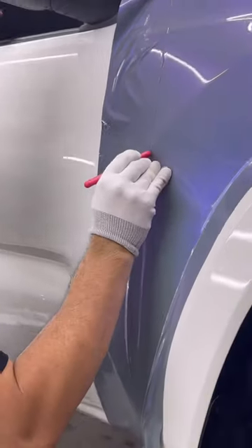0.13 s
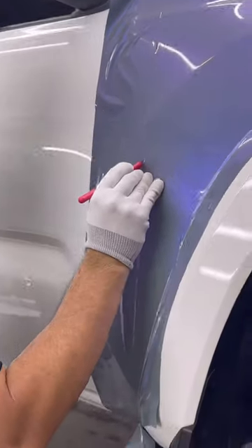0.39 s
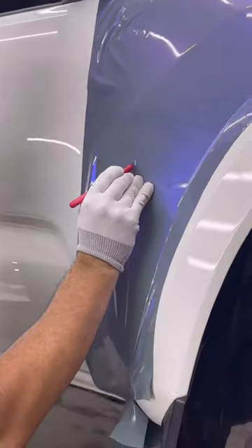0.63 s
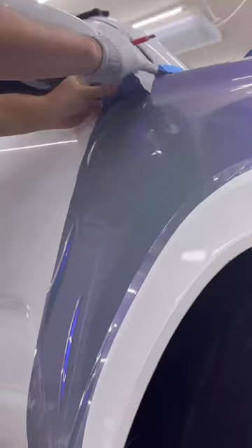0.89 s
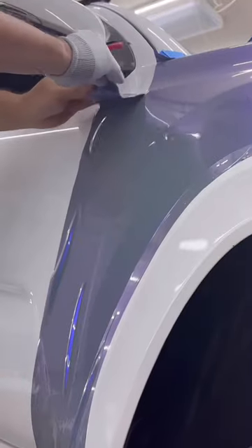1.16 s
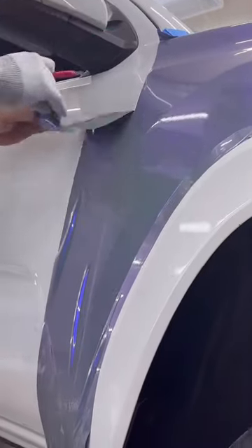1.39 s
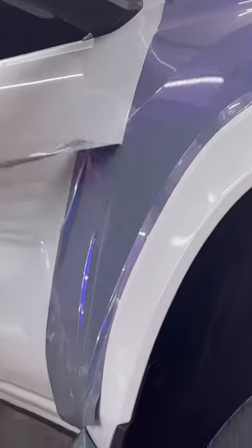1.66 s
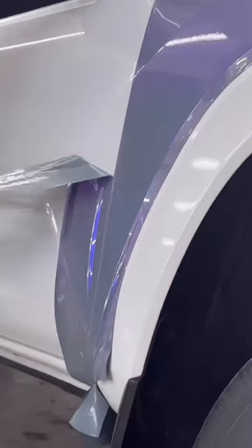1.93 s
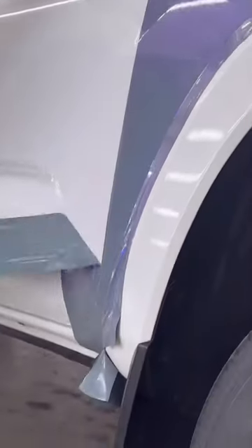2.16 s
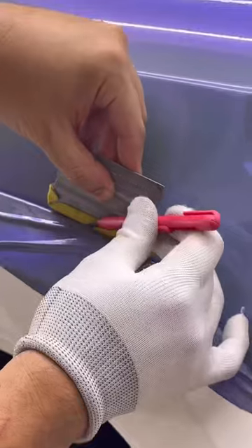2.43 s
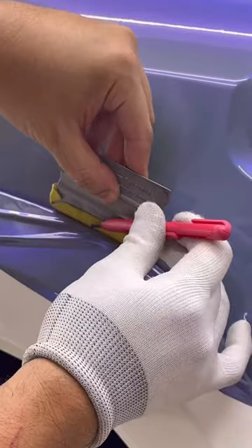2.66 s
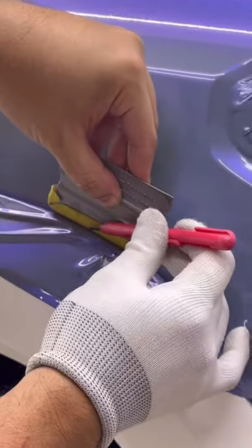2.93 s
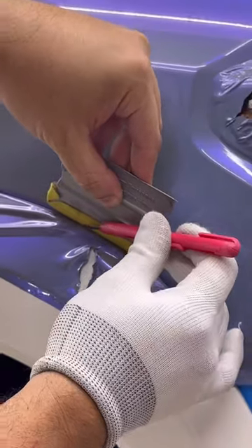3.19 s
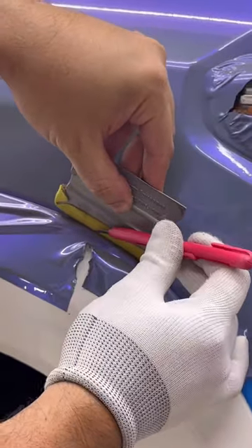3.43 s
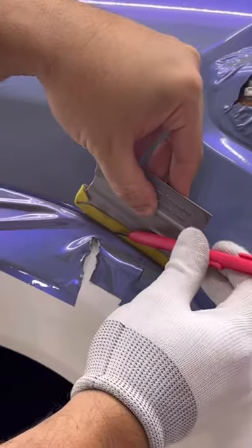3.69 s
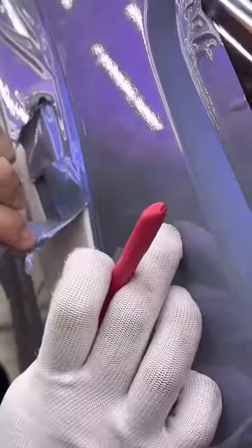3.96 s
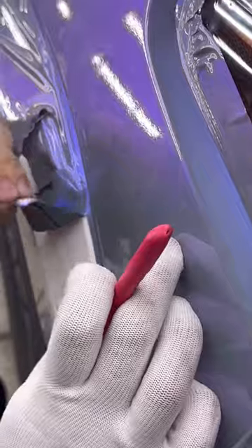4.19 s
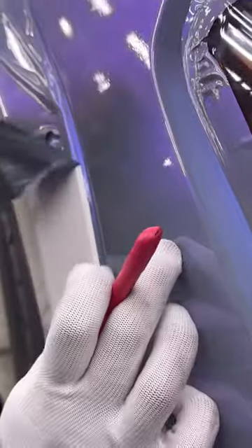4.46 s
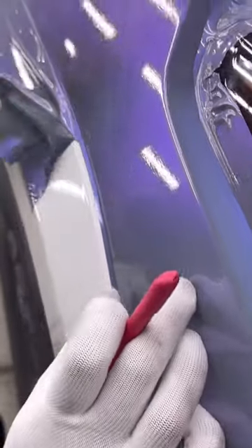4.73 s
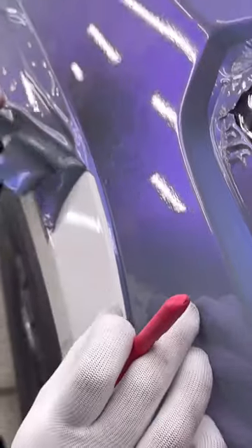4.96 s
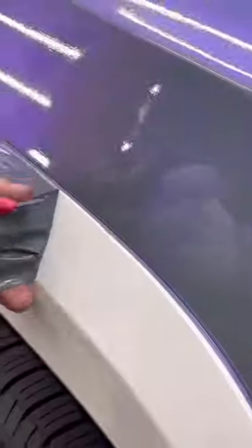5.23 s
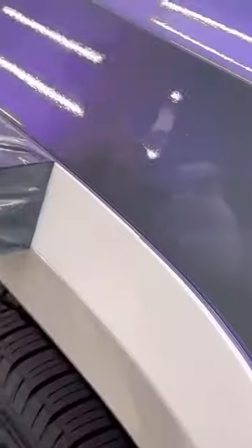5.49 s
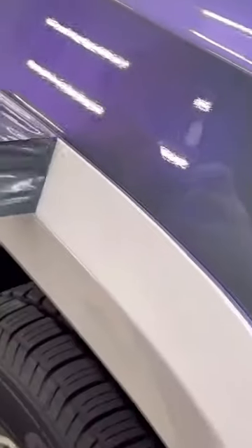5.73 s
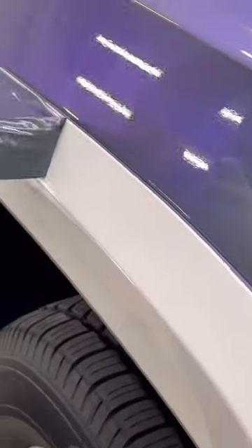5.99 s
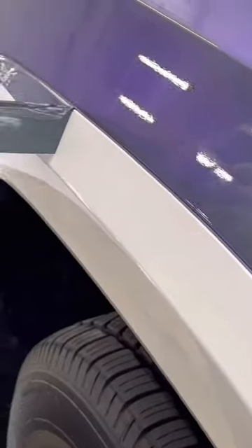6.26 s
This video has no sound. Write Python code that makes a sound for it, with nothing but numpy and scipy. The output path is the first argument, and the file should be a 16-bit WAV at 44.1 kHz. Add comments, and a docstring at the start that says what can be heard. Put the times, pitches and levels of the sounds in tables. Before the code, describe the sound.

In a workshop with low rumble, a blade slides with a faint hiss and small ticks. A wide sheet of sticky vinyl then rips off a car panel in dense, taut, hollow-ringing bursts. It stops abruptly for a very quiet scrape, then a narrow strip pops loose in sharp snaps and light rustle, ending in a rapid zipping peel. Close stereo microphone, short room answer.

```python
"""A low rumble and the hiss of a sliding blade come first, with small ticks where the blade catches.
Then a wide strip of vinyl wrap rips off a car panel in bursts, a blade follows a squeegee, and a narrow
strip snaps loose, rustles and zips away. Each letting-go of the glue is a short burst of ringing noise that
also drums the taut film. Rumble, air and blade are coloured noise; decaying noise makes the workshop's answer."""
import sys
import numpy as np
from scipy import signal
from scipy.fft import rfft, irfft, next_fast_len
from scipy.io import wavfile
from scipy.ndimage import map_coordinates

SR = 44100
rng = np.random.default_rng(int(sys.argv[2]) if len(sys.argv) > 2 else 0)


def dump(signal):
    """Clip the signal to [-1, 1] and save it as 16-bit WAV at the path in sys.argv[1]."""
    limited = np.clip(np.atleast_2d(signal).T, -1, 1)
    pcm = np.round(limited * 32767).astype(np.int16)
    wavfile.write(sys.argv[1], SR, pcm)


def volts_from_decibels(level):
    """Turn decibel levels (scalar or array-like) into linear amplitude factors."""
    exponent = np.asarray(level, float) / 20
    return 10 ** exponent


N = 280917

# The four parts: blade, wide strip, blade after squeegee, narrow strip. Columns: start_s, end_s
PARTS = [(0, .835), (.835, 2.316), (2.316, 3.89), (3.89, 6.37)]


def during(part):
    """One inside a part, zero outside, with a 3 ms slope at each end."""
    t = np.arange(N) / SR
    return np.clip(np.minimum(t - part[0], part[1] - t) / .003 + .5, 0, 1)


def unit(x):
    """Scale a sound to an rms level of 1."""
    return x / np.sqrt(np.mean(x ** 2) + 1e-20)


def along(points, hz):
    """Read a curve of (Hz, value) points on a logarithmic frequency axis."""
    f, v = np.transpose(points)
    return np.interp(np.log(hz + 1), np.log(f + 1), v)


def read(rows, t):
    """Read each column after the time column, at times t."""
    s, *columns = np.transpose(rows)
    return [np.interp(t, s, column) for column in columns]


def wobble(rate, t):
    """A smooth random curve at times t, with rate random points a second."""
    return map_coordinates(rng.standard_normal(int(N * rate / SR) + 4), [t * rate])


def filtered(x, response):
    """Multiply the spectrum of x by a complex response of frequency."""
    m = next_fast_len(x.shape[-1] + 8192)
    return irfft(rfft(x, m) * response(np.fft.rfftfreq(m, 1 / SR)), m)[..., :x.shape[-1]]


def peak(f, hz, width):
    """A resonance at hz that rings only after it is struck; a narrow one rings longer."""
    return 1j * f * width / (hz * hz - f * f + 1j * f * width)


def causal(points):
    """A colour whose ringing starts at the blow (minimum phase)."""
    def response(hz):
        cepstrum = irfft(np.log(volts_from_decibels(along(points, hz)) + 1e-6))
        at = np.arange(len(cepstrum))
        # keep the half after time zero, doubled
        fold = 2 * (at < len(at) // 2) - (at == 0)
        return np.exp(rfft(cepstrum * fold))
    return response


def spread(pair, alike, colour):
    """Mix two unrelated signals into a left and right of given likeness at each frequency."""
    def mid_and_side(hz):
        turn = np.arccos(np.clip(along(alike, hz), -1, 1)) / 2
        return colour(hz) * [np.cos(turn), np.sin(turn)]
    mid, side = filtered(pair, mid_and_side)
    return np.array([mid + side, mid - side])


def rush(spectrum, alike):
    """Coloured stereo noise with an rms level of 1."""
    return unit(spread(rng.standard_normal((2, N)), alike, lambda hz: volts_from_decibels(along(spectrum, hz))))


# Rumble loudness, one list per part. Columns: time_s, level_db
RUMBLE_LEVELS = [
    [(0, -43.5), (.3, -44.5), (.57, -44), (.83, -45)],
    [(.85, -47.5), (1.38, -38.5), (1.55, -45.5), (1.65, -27.5), (1.92, -31.5), (2.0, -42), (2.3, -43)],
    [(2.34, -62), (2.5, -69.5), (2.75, -60.5), (2.9, -67.5), (3.87, -63.5)],
    [(3.9, -48.5), (4.01, -52), (4.13, -59), (4.23, -63), (4.33, -51.5), (5.12, -60), (5.15, -45.5),
     (5.54, -35.5), (5.65, -42.5), (5.72, -35.5), (5.83, -46), (5.9, -38), (6.0, -47), (6.24, -42.5),
     (6.27, -31), (6.37, -43.5)],
]
# Rumble colour in the first part, the middle two and the last. Columns: pitch_hz, relative_db
RUMBLE_COLOURS = [
    [(21, -67), (35, -40), (73, -11.5), (102, 5.5), (130, -11), (161, 2), (194, -14.5), (231, -9),
     (301, -39.5), (376, -34), (400, -26), (520, -42), (880, -120)],
    [(20, -29), (45, -4.5), (72, -4.5), (110, -3.5), (162, -11.5), (233, -12.5), (300, -21.5), (500, -35),
     (800, -82)],
    [(20, -26), (45, -13.5), (72, 1.5), (110, -0.5), (162, -3), (233, -1), (300, -16), (500, -23),
     (800, -90)],
]
# Colour of the workshop air. Columns: pitch_hz, relative_db
AIR_COLOUR = [(150, -27.5), (250, -5.5), (447, -10), (480, -11), (775, -16), (4960, -34), (5730, -26),
              (8000, -49.5), (10400, -74), (17600, -120)]
# Loudness of the air, one value per part: level_db
AIR_LEVELS = [-71, -57.5, -72.5, -85]
# How alike left and right are in background noise. Columns: pitch_hz, likeness (1 = the same)
AIR_ALIKE = [(60, .998), (150, 1), (300, 1), (650, 0.14), (1300, 0.87), (2400, 0.31), (6000, 0.42),
             (15000, 0.31)]


def rumble_and_air():
    """Steady noises of the workshop, low rumble and soft air, whose levels change from part to part."""
    t = np.arange(N) / SR
    first, middle, last = [rush(colour, AIR_ALIKE) for colour in RUMBLE_COLOURS]
    sound = sum(during(part) * volts_from_decibels(db) for part, db in zip(PARTS, AIR_LEVELS)) * rush(AIR_COLOUR, AIR_ALIKE)
    for part, rows, noise in zip(PARTS, RUMBLE_LEVELS, [first, middle, middle, last]):
        sound = sound + during(part) * volts_from_decibels(read(rows, t)[0]) * noise
    return sound


# Loudness of the sliding blade, one list per trimming part. Columns: time_s, level_db (before the wobble)
BLADE_LEVELS = [
    [(0, -56), (.03, -70), (.2, -70), (.45, -67), (.6, -64.5), (.67, -61.5), (.72, -68), (.79, -63),
     (.83, -70)],
    [(2.34, -72.5), (2.65, -67), (2.92, -74), (3.04, -85), (3.14, -79), (3.34, -80.5), (3.45, -82),
     (3.87, -88)],
]
# Colour of its hiss, one list per trimming part. Columns: pitch_hz, relative_db
BLADE_COLOURS = [
    [(880, -4), (1300, -4), (2200, -8.5), (3000, -6), (3900, -8), (5840, -16), (10400, -10), (15000, -17.5)],
    [(1060, -18), (1800, -9), (1990, -5), (2360, -5), (3040, -10), (3530, -19.5), (4590, -24.5), (5970, 4),
     (9000, -35), (11700, -67), (19800, -120)],
]


def blade():
    """The sliding blade scrapes: noise with an unsteady level in the first and third parts."""
    t, sound = np.arange(N) / SR, 0
    for part, rows, colour in zip(PARTS[::2], BLADE_LEVELS, BLADE_COLOURS):
        level_db = read(rows, t)[0] + 1.8 * wobble(30.0, t)
        sound = sound + during(part) * volts_from_decibels(level_db) * rush(colour, AIR_ALIKE)
    return sound


# Overall colour of every snap. Columns: pitch_hz, relative_db
SNAP_COLOUR = [(250, -35), (500, -0.5), (860, -9.5), (1200, 0.5), (2130, -0.5), (3930, -3), (6190, -1),
               (8540, -5), (10500, -2.5), (13000, -13.5), (15300, -3.5), (16000, -17), (16600, -64)]
# Resonances of taut film and panel, kicked by every snap. Columns: pitch_hz, width_hz, relative_db
DRUM_RINGS = [(232, 120, -4.5), (376, 190, -1), (604, 110, 0.5), (766, 170, -2.5), (1050, 260, 0)]
EDGE_HZ, EDGE_WIDTH_HZ = 5700, 1600  # second, high ring of the narrow strip


def snaps(s, db, hz, drum_db, life, sharp, ring, edge=0, crisp=0, room_db=0, scatter_db=0):
    """Glue lets go: a noise burst rings near its pitch and kicks the film. Rows: heard directly, sent to room.

    s: times; life: noise life in s; sharp: pitch over ring width; crisp: click over noise."""
    size = 256
    t, f = np.arange(size) / SR, np.fft.rfftfreq(size, 1 / SR)
    grit = rng.standard_normal((len(s), size))
    edge_luck, drum_luck, life_luck = rng.standard_normal((3, len(s), 1))
    tone = 1 + ring * peak(f, hz[:, None], hz[:, None] / sharp)
    tone = tone + edge * volts_from_decibels(scatter_db * edge_luck) * peak(f, EDGE_HZ, EDGE_WIDTH_HZ)
    u = t / (life * np.exp(.3 * life_luck))
    push = grit * u * np.exp(-u)
    # a clean click 0.2 ms into the burst
    push[:, 8] -= crisp * np.linalg.norm(push, axis=1)
    # the room gathers all directions, so it hears the smooth colour of the snap
    direct, to_room = rfft(push, axis=1) * tone, np.sign(grit[:, :1]) * tone ** .5
    bursts = irfft([direct, to_room], size)
    bursts *= volts_from_decibels([db, db + room_db])[..., None] / np.sqrt(np.sum(bursts ** 2, 2, keepdims=True))
    at = np.round(s * SR).astype(int)
    places = (at[:, None] + np.arange(size)).ravel()
    crack = np.array([np.bincount(places, b.ravel(), N + size)[:N] for b in bursts])
    kicks = np.bincount(at, volts_from_decibels(db + drum_db + 2 * drum_luck[:, 0]), N)[:N]

    def drum(f):
        # neighbouring rings have opposite signs
        return sum((-1) ** k * volts_from_decibels(level) * peak(f, c, w) for k, (c, w, level) in enumerate(DRUM_RINGS))
    return filtered(crack, causal(SNAP_COLOUR)) + filtered(kicks, drum)


# Modes of the car panel that ring on. Columns: pitch_hz, width_hz, relative_db
PANEL_RINGS = [(219.4, 13, 2), (413, 39, -2.5), (580, 23, -10), (770, 20, -5), (1055, 53, 2),
               (1245, 40, -13)]


def panel(s, db):
    """Each lone snap sets the panel's modes ringing, unevenly."""
    at, sound = np.round(s * SR).astype(int), 0
    for hz, width, level in PANEL_RINGS:
        uneven_db = 3.4 * rng.standard_normal(len(s))
        blows = np.bincount(at, volts_from_decibels(db + level + uneven_db), N)
        sound = sound + filtered(blows, lambda f: peak(f, hz, width))
    return sound


# Treble gain applied to single snaps and ticks, raised around 12 kHz. Columns: pitch_hz, gain_db
LONE_TREBLE = [(3000, -0.5), (6500, -0.5), (9500, 4.5), (11000, 7), (12500, 8), (14000, 6.5)]


def lone_snaps(s, db, hz, edge_db, shake_db, sharp):
    """Single snaps that shake the panel too; they stir the room less than zipping slips do."""
    lone = snaps(s, db, hz, drum_db=-0.5, life=0.00052, sharp=sharp, ring=2.5, edge=volts_from_decibels(edge_db)[:, None],
                 crisp=0.78, room_db=shake_db, scatter_db=4.0)
    direct, to_room = filtered(lone, causal(LONE_TREBLE))
    return np.array([direct + panel(s, db + shake_db), to_room * volts_from_decibels(-3)])


# Moments when the blade catches. Columns: time_s, level_db, pitch_hz
CATCHES = [(.103, -46, 2500), (.113, -36.5, 3300), (.447, -33.5, 3700), (.587, -45.5, 2760),
           (.596, -39.5, 5600), (.605, -43, 2840), (.624, -43, 2800), (.648, -48.5, 2840),
           (.666, -43.5, 2730), (.743, -44.5, 3200), (.784, -40.5, 3600), (.786, -47.5, 1550)]


def blade_catches():
    """The blade catches: small, clearly pitched ticks with almost no high second ring."""
    s, db, hz = np.transpose(CATCHES)
    return lone_snaps(s, db, hz, np.full(len(s), -40), np.zeros(len(s)), sharp=9)


# How long the main part of the answer lasts. Columns: pitch_hz, fall_by_60_db_s
SHOP_DECAY = [(200, 0.2), (530, 0.27), (1400, 0.15), (3700, 0.15), (7000, 0.14), (10000, 0.14),
              (15000, 0.11)]
# How alike left and right are in the answer. Columns: pitch_hz, likeness (1 = the same)
SHOP_ALIKE = [(150, 1), (640, 0.8), (1400, 0.98), (3100, 1), (6000, 0.29), (10000, 0.79), (15000, 0.98)]


def shop(x):
    """The workshop answers with a noise tail in which each frequency dies at its own speed."""
    hz, t, z = signal.stft(rng.standard_normal((2, 2 * SR // 3)), SR, nperseg=256)
    fall_db = -60 * t / along(SHOP_DECAY, hz)[:, None]
    # the far end of the hall answers weaker and four times longer
    far_db = -7.5 + fall_db / 4
    tail = signal.istft(z * (volts_from_decibels(fall_db) + volts_from_decibels(far_db)), SR, nperseg=256)[1]
    # the answer starts 130 samples (3 ms) late
    late = np.pad(x, (130, 0))[None]
    wet = signal.fftconvolve(late, tail / np.linalg.norm(tail[0]), axes=1)[:, :N]
    return spread(wet, SHOP_ALIKE, np.ones_like)


# Three rings of the wide lifted sheet.
# Columns: time_s, low_hz, middle_hz, high_hz, low_db, middle_db, high_db
SHEET_RINGS = [(0.95, 587, 1274, 2240, 1.5, -7.5, -0.5), (0.976, 620, 1352, 2320, 4.5, -3.5, -7.5),
               (1.084, 603, 1188, 2650, 5.5, -2.5, -2), (1.174, 662, 1238, 2340, 4, -8.5, -2.5),
               (1.242, 600, 1216, 2540, 1, -7, -1.5), (1.272, 712, 1176, 2340, 1, -6.5, -4.5),
               (1.392, 764.4, 1224, 2114, -4.5, -5, -1), (1.446, 653, 1333, 2190, 0.5, -5, -3.5),
               (1.486, 684, 1267, 1920, 5, -6, -3.5), (1.656, 693, 1240, 2410, 11, -2, -5.5),
               (1.796, 630, 1246, 2030, 6.5, -7, -5), (1.836, 575, 1160, 2170, 3.5, -5.5, -5.5),
               (1.896, 733, 1350, 2080, 5.5, -8, -11), (1.946, 670, 1382, 2050, 5, -4.5, -8),
               (2.088, 740, 1364, 2170, 6.5, -4, -4.5), (2.144, 629.5, 1150, 2110, 6, 6.5, -6.5),
               (2.236, 676, 1270, 2280, -2, -3.5, -3), (2.3, 835, 1290, 2450, -2.5, 0, -16.5)]
# Widths of those three rings: width_hz
SHEET_WIDTHS = [30, 120, 550]
# Treble gain during the wide peel, dipping near 11 kHz. Columns: pitch_hz, gain_db
WIDE_TREBLE = [(3000, -1.5), (6000, 0), (9500, 3), (10800, -14.5), (13200, -7), (14500, 0)]


def sheet(x):
    """The lifted sheet colours the tearing with rings that move as it is pulled."""
    a, b = round(PARTS[1][0] * SR) - 2048, round(PARTS[1][1] * SR) + 2048
    f, t, z = signal.stft(x[:, a:b], SR, nperseg=2048, noverlap=1792)
    f, t = f[:, None], t + a / SR
    rings = read(SHEET_RINGS, t)
    gain = 1 + sum(volts_from_decibels(db) * peak(f, hz, w) for hz, db, w in zip(rings[:3], rings[3:], SHEET_WIDTHS))
    # many narrow folds ring too; they come, go and drift in pitch as the sheet flexes
    for hz in np.geomspace(466, 3300, 24) * np.exp(.04 * rng.standard_normal(24)):
        fold_db = -6 + 6 * wobble(16, t)
        fold_hz = hz * np.exp(.035 * wobble(5, t))
        gain = gain + volts_from_decibels(fold_db) * peak(f, fold_hz, hz / 35)
    y = signal.istft(z * gain * volts_from_decibels(along(WIDE_TREBLE, f)), SR, nperseg=2048, noverlap=1792)[1]
    return np.pad(y[:, :b - a], ((0, 0), (a, N - b)))


# Steady tearing of the wide strip. Columns: time_s, snap_level_db, pitch_hz (before random scatter)
TEARING = [(.845, -26, 1590), (.925, -34.5, 1600), (1.1, -26.5, 2650), (1.24, -10, 2315), (1.36, -6, 1518),
           (1.43, -6, 2280), (1.465, -1.5, 2000), (1.505, -0.5, 1800), (1.52, -9.5, 1500), (1.55, -5, 1203),
           (1.59, -11.5, 1209), (1.75, -13.5, 1490), (1.92, -2, 1586), (2.0, -2, 2317), (2.08, -1.5, 2000),
           (2.14, -2.5, 1900), (2.16, -9.5, 1700), (2.2, -5, 1492), (2.29, -6.5, 1960)]
# Rips of the wide strip. Columns: top_s, snap_level_db, length_s, pitch_hz (before random scatter)
RIPS = [(0.9428, 5.5, 0.0056, 1522), (0.989, 1, 0.01, 1486), (1.018, -2, 0.0063, 1180),
        (1.036, -3, 0.0063, 4460), (1.072, 3, 0.0054, 1118), (1.105, 3.5, 0.0055, 2655),
        (1.136, 4, 0.0051, 1214), (1.161, 2.5, 0.01, 1220), (1.174, -5, .008, 2500),
        (1.201, -1, 0.0077, 2596), (1.184, -2.5, 0.0049, 2660), (1.21, 0, 0.017, 965),
        (1.2275, 2, 0.0079, 2498), (1.301, -4.5, 0.008, 2002), (1.306, -2, 0.0078, 2430),
        (1.386, -0.5, 0.017, 2148), (1.393, -3.5, 0.0025, 1050), (1.607, 3, 0.015, 2210),
        (1.6402, 2, 0.022, 2205), (1.675, 1, 0.021, 2524), (1.711, 6, 0.012, 2147), (1.741, 1, 0.02, 1169),
        (1.772, 1, .022, 930), (1.799, -0.5, 0.02, 1167), (1.826, 0.5, 0.016, 1100),
        (1.852, 0, 0.011, 2010), (1.882, 2, 0.0074, 2278), (1.899, -3.5, 0.008, 1490),
        (1.928, 0, 0.013, 1288), (2.131, -2, 0.0064, 2044), (2.174, 0, 0.014, 1345), (2.21, 1, 0.02, 1262)]
# Part of a rip's length spent swelling. Small = abrupt onset; abrupt at first and again near 1.6 s.
# Columns: time_s, share
RISE_SHARE = [(1.15, 0.075), (1.3, 0.51), (1.58, 0.36), (1.6, 0.11), (1.63, 0.46)]


def wide_strip():
    """Snaps come densely along the peel front; they swell and change pitch as each stretch of glue rips."""
    s = np.arange(PARTS[1][0], PARTS[1][1], 1 / 2400)
    time_luck, level_luck, pitch_luck = rng.standard_normal((3, len(s)))
    s = s + .0003 * time_luck
    tear_db, hz = read(TEARING, s)
    power = volts_from_decibels(tear_db) ** 2
    # the tearing pitch wanders quickly
    pitch = power * hz * np.exp(0.31 * wobble(30, s))
    for top, db, length, rip_hz in RIPS:
        rise = np.clip(read(RISE_SHARE, top)[0], .05, .95)
        before = s < top
        distance = np.abs(s - top) / (length * np.where(before, rise, 1 - rise))
        # bell-shaped swell, then a dying between exponential (1) and bell (2)
        swell = volts_from_decibels(db - 9.36 * distance ** np.where(before, 2, 1.3)) ** 2
        power, pitch = power + swell, pitch + swell * rip_hz
    db = 10 * np.log10(power) + 3 * level_luck
    hz = pitch / power * np.exp(0.14 * pitch_luck)
    return sheet(snaps(s, db, hz, drum_db=6, life=0.00027, sharp=3, ring=0.9, crisp=0.77))


# Single snaps of the narrow strip.
# Columns: time_s, level_db, pitch_hz, high_ring_db, shake_db (share that shakes panel and room)
STRIP_SNAPS = [(3.8959, 5.5, 4030, 4, 7.5), (3.8979, -17, 1066, -11, -1), (4.065, -6.5, 6050, -11, 1),
               (4.078, 1, 4260, -9, 1), (4.094, -6, 5380, -16, -6), (4.1768, -17.5, 4060, -6, -2),
               (4.203, -15.5, 4740, -10, -1), (4.2185, 1, 3750, -11.5, -5.5), (4.2303, -2, 5025, -15, 2.5),
               (4.245, 2.5, 3020, -11, -3), (4.322, 9.5, 6480, -15, 1.5), (4.3315, 8, 6350, -14.5, -5.5),
               (4.3374, 1.5, 6600, -15, -3), (4.342, 3, 6640, -14.5, -4), (4.3567, -0.5, 6980, -15.5, 5),
               (4.3624, 2, 3490, -6, 1), (4.3779, -0.5, 6150, -15, -4.5), (4.393, -11, 2770, -11, 5),
               (4.4083, 2, 4500, -12, -4), (4.434, -10, 4100, -9, -1), (4.4619, -14.5, 5900, -15, 10),
               (4.4754, -14, 5620, -15, -6), (4.498, -18, 3100, -9, 0), (4.507, -18, 4400, -8, -3),
               (4.528, -14, 7070, -15, 4.5), (4.538, -15.5, 6890, -15, -3), (4.555, -16, 5400, -15, 1),
               (4.5655, -16, 7150, -15, -3), (4.574, -10.5, 2700, -9, 13.5), (4.5827, -13, 6640, -15, -3),
               (4.588, -8.5, 7100, -15, 2), (4.6028, -11, 6720, -13, -5), (4.616, -11, 7350, -17, -3.5),
               (4.635, -14, 4610, -6, 0), (4.6399, -2.5, 2900, -6.5, -1.5), (4.6456, -2.5, 2560, -13, -9),
               (4.6728, -9, 6500, -14, -13), (4.6879, 0.5, 7100, -15, -12), (4.701, 7, 2700, -3, -5.5),
               (4.8715, 8, 6250, -8.5, -5), (4.9546, -19, 6900, -3, -10.5), (5.1397, 8.5, 1860, -9, 1),
               (5.1494, 6, 3300, -18, -4), (5.1673, 10, 1640, 0, -2.5), (5.2204, 9.5, 3540, -14, -1),
               (5.2312, 9, 3210, -9, -2.5), (5.2482, 4, 5370, -15, -4), (5.2688, 4, 3340, -11, 4),
               (5.2799, 9.5, 1700, -16, 0)]


def strip_snaps():
    """Lone snaps as the narrow strip is picked loose."""
    return lone_snaps(*np.transpose(STRIP_SNAPS), sharp=3.6)


# Hums of panel and lifted strip; the first three rows are panel rings.
# Columns: start_s, end_s, pitch_hz, level_db
HELD_HUMS = [(3.899, 3.96, 433, -43), (3.898, 3.94, 1055, -42), (4.872, 4.95, 770, -47),
             (5.29, 5.468, 580, -42.5), (5.304, 5.417, 190, -37), (5.337, 5.526, 352, -39),
             (5.535, 5.633, 571, -33.5), (5.691, 5.882, 371.6, -33.5), (5.698, 5.807, 177, -31),
             (5.992, 6.39, 240.6, -39.5), (6.077, 6.39, 191.5, -36)]


def panel_and_strip_hums(shaking):
    """Snaps shake the panel and the lifted strip, and each hum sounds between its start and end."""
    t, hum = np.arange(N) / SR, 0
    for start, end, hz, db in HELD_HUMS:
        held = np.clip(np.minimum(t - start, end - t) / 0.012, 0, 1)
        # 15 Hz wide, so the hum is rough
        note = filtered(shaking, lambda f: peak(f, hz, 15))
        hum = hum + volts_from_decibels(db) * held * note / np.sqrt(np.mean(note[held > 0] ** 2))
    return hum


# Fine crackle of the handled strip. Columns: time_s, snap_level_db (before random scatter)
RUSTLE_LEVELS = [(4.16, -34.5), (4.3, -27), (4.45, -29), (4.54, -42), (4.57, -17.5), (4.61, -20),
                 (4.63, -46), (4.7, -45)]


def rustle():
    """Tiny scattered snaps, some high and some low, while the fingers work the strip loose."""
    time_luck, level_luck, pitch_luck, side = rng.standard_normal((4, 190))
    s = np.linspace(RUSTLE_LEVELS[0][0], RUSTLE_LEVELS[-1][0], 190) + 0.0011 * time_luck
    db = read(RUSTLE_LEVELS, s)[0] + 4 * level_luck
    hz = np.where(side > 0, EDGE_HZ, 2800) * np.exp(0.3 * pitch_luck)
    return snaps(s, db, hz, drum_db=-1.6, life=0.00029, sharp=5.9, ring=0.99)


# First, slower slips of the zipping strip. Columns: time_s, level_db, pitch_hz
FIRST_SLIPS = [(5.2995, 3.5, 1410), (5.311, 8.5, 1290), (5.3199, 7.5, 3300), (5.3328, 8, 3395),
               (5.3444, 9.5, 2110), (5.3494, 4.5, 3470), (5.3547, 0, 3330), (5.3609, 3.5, 2020),
               (5.3735, 2.5, 1550), (5.3912, 10.5, 1950), (5.3976, 9.5, 1905), (5.4096, 6.5, 3640),
               (5.42, 5.5, 1330), (5.4302, 11, 2030), (5.439, 9, 1960), (5.4474, 10.5, 1970),
               (5.4558, 7, 3530), (5.4635, 4, 1210), (5.4765, 4.5, 3430), (5.4846, 3.5, 1290),
               (5.4997, 9.5, 1506), (5.5109, 7, 2110), (5.5207, 4.5, 1340), (5.5262, 4, 1500),
               (5.5329, 8, 2040), (5.5417, 5, 1930), (5.5486, 0, 2070), (5.5555, -3, 2020),
               (5.5623, 8.5, 2010), (5.5675, 1.5, 1210), (5.5726, 1, 2020), (5.5818, 6.5, 1220),
               (5.5867, 3.5, 1340), (5.5913, 3.5, 1940), (5.5979, 1.5, 1990), (5.6044, 1.5, 2070),
               (5.6106, 2.5, 3350), (5.6175, 3.5, 2060), (5.6229, 1, 1980), (5.6285, -0.5, 2110),
               (5.6349, 3.5, 2040), (5.648, 0.5, 3420), (5.6544, 8, 2010), (5.6637, 3.5, 1290),
               (5.6744, 6.5, 2754), (5.6847, 4.5, 1200), (5.6975, 6, 1190)]
# The steady zip after them. Columns: time_s, level_db, slips_per_s, pitch_hz (before random scatter)
ZIP = [(5.705, 6, 165, 1350), (5.76, 5, 160, 2040), (5.81, 5.5, 155, 3210), (5.85, 5, 160, 2370),
       (5.9, 5, 175, 2360), (5.93, 2.5, 190, 2960), (5.96, 1.5, 215, 2960), (6.0, 4, 200, 3950),
       (6.04, 4, 190, 3300), (6.06, 1.5, 190, 1980), (6.08, 3, 200, 3440), (6.11, 5, 205, 2840),
       (6.14, 3, 200, 1400), (6.19, 4, 180, 1980), (6.23, 4.5, 170, 1510), (6.28, -2.5, 230, 2350),
       (6.37, 0, 215, 2310)]
# Slips grow cleaner and shorter as the zip goes on.
# Columns: time_s, click_over_noise, noise_life_s, ring_sharpness
CLEANER = [(5.3, 1.1, .0004, 4.5), (5.65, 1.5, .0003, 4), (5.9, 1.9, .00028, 3), (6.1, 2.6, .00024, 2.2)]
# The high ring comes and goes while zipping. Columns: time_s, relative_db
ZIP_EDGE = [(5.3, -1), (5.36, -9), (5.42, -8), (5.46, 5), (5.5, -7), (5.535, 1), (5.56, -13), (5.59, -1),
            (5.62, -20), (5.67, -11), (5.73, 4), (5.78, -4), (5.83, 2), (5.87, -6), (5.91, 0), (5.97, -4),
            (6.04, 1), (6.06, -12), (6.09, 3), (6.17, 4), (6.19, -11), (6.23, 0), (6.3, -5.5)]
# One steady ring of the zipping strip: pitch_hz, width_hz, relative_db
MID_RING = (3400, 440, -4.5)


def zipping():
    """The strip sticks and slips at the pulling rate, and each slip is a clean click with a little noise."""
    t = np.arange(ZIP[0][0], N / SR - .002, 1 / SR)
    slip_count = np.cumsum(read(ZIP, t)[1]) / SR
    s = t[np.searchsorted(slip_count, np.arange(0, slip_count[-1] - 1))]
    time_luck, level_luck, pitch_luck = rng.standard_normal((3, len(s)))
    s = np.clip(s + 0.0009 * time_luck, 0, t[-1])
    db, _, hz = read(ZIP, s)
    steady = [s, db + 2 * level_luck, hz * np.exp(0.21 * pitch_luck)]
    s, db, hz = np.hstack([np.transpose(FIRST_SLIPS), steady])
    crisp, life, sharp = read(CLEANER, s)
    edge = volts_from_decibels(read(ZIP_EDGE, s)[0])[:, None]
    slips = snaps(s, db, hz, drum_db=1.5, life=life[:, None], sharp=sharp[:, None], ring=2.6, edge=edge,
                  crisp=crisp, scatter_db=2.0)
    ring_hz, ring_width, ring_db = MID_RING
    slips = filtered(slips, lambda f: 1 + volts_from_decibels(ring_db) * peak(f, ring_hz, ring_width))
    # from 300 to 8000 Hz each frequency arrives 0.8 of its own cycle late
    return filtered(slips, lambda f: -np.exp(-2j * np.pi * .8 * np.log(np.clip(f, 300, 8000) / 8000)))


# How alike left and right are in the wide peel front. Columns: pitch_hz, likeness (1 = the same)
FRONT_ALIKE = [(60, 0.89), (300, 1), (640, 0.94), (1400, 1), (3100, 0.57), (6000, 0.6), (10000, 0.96),
               (15000, .8)]


def scene():
    """All layers together; the wide peel and its room stop when its part ends."""
    background = rumble_and_air() + blade()
    wide = wide_strip()
    front = spread(wide, FRONT_ALIKE, np.ones_like) * volts_from_decibels([[-.2], [.2]])
    wide = during(PARTS[1]) * (front + volts_from_decibels(-8.0) * shop(wide[1]))
    direct, to_room = blade_catches() + strip_snaps() + rustle() + zipping()
    return background + wide + direct + panel_and_strip_hums(to_room) + volts_from_decibels(-4.5) * shop(to_room)


def roll_off(x):
    """The treble ends steeply here."""
    return signal.sosfilt(signal.butter(12, 17140, fs=SR, output="sos"), x)


# Phase between the two microphone ports. Columns: pitch_hz, left_leads_rad
PORT_PHASE = [(100, 0), (5000, .05), (7000, -1.1), (9000, -2.2), (10200, -3.1), (13700, -3.2),
              (15500, -4.2)]


def record(dry):
    """Loud peaks are rounded off; the two ports drift apart in phase towards the treble, up to 16 kHz."""
    rounded = dry / (1 + np.abs(dry / .95) ** 4) ** (1 / 4)

    def ports(hz):
        phase = along(PORT_PHASE, hz) / [[2], [-2]]
        band_limit = np.clip((16050 - hz) / 250, 0, 1)
        return np.exp(1j * phase) * band_limit
    mix = filtered(rounded, ports)
    return roll_off(mix)


dry = scene()
out = record(dry)
dump(out)
```